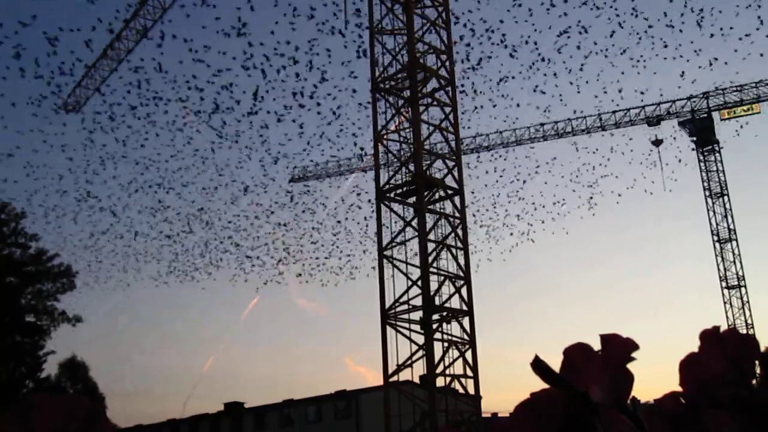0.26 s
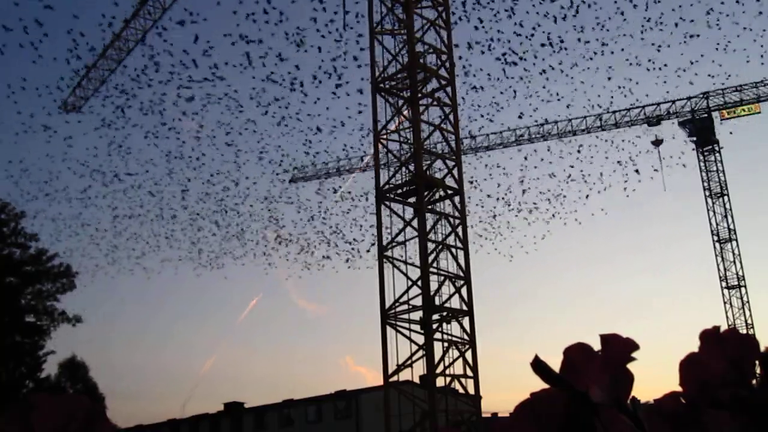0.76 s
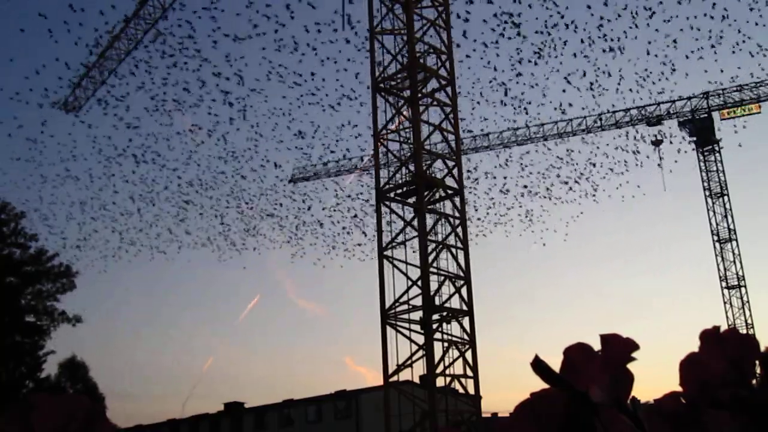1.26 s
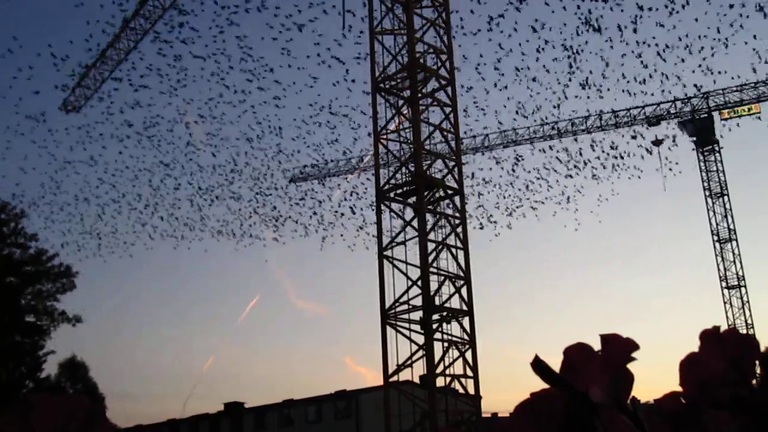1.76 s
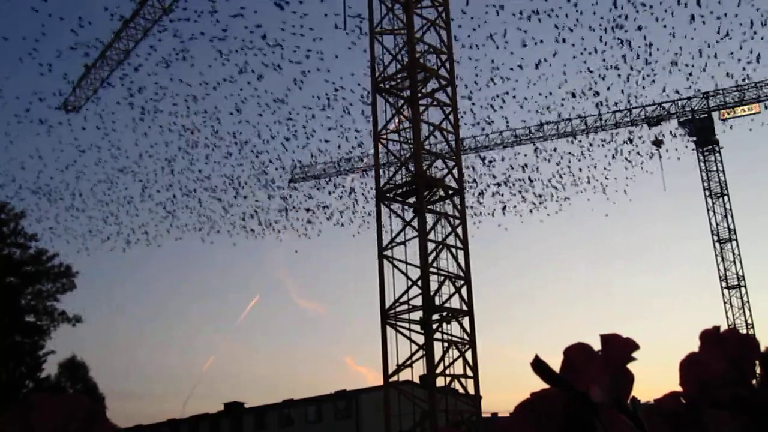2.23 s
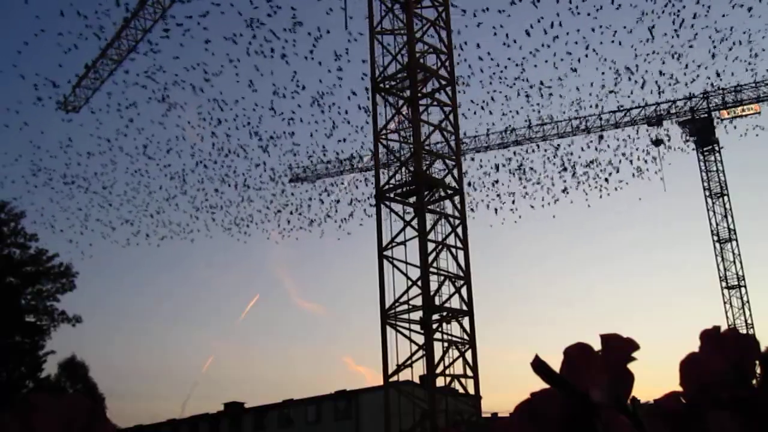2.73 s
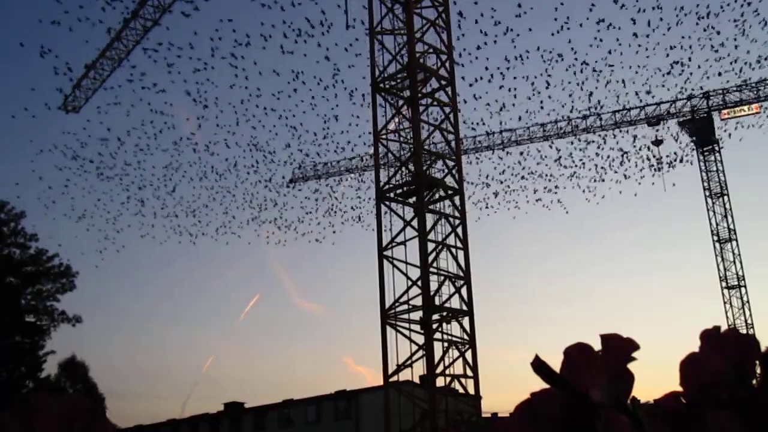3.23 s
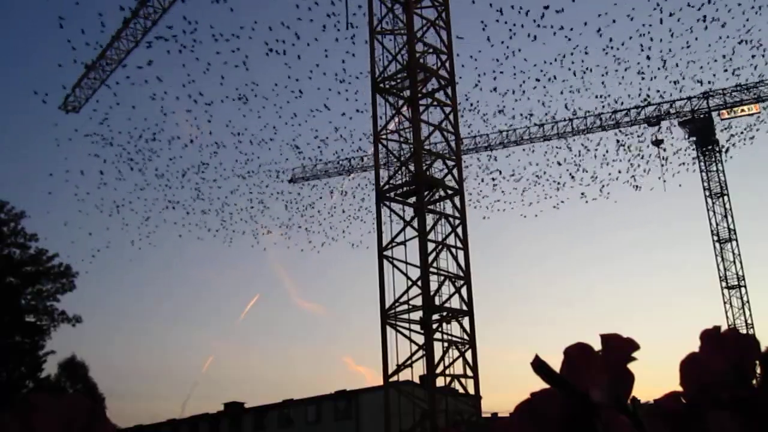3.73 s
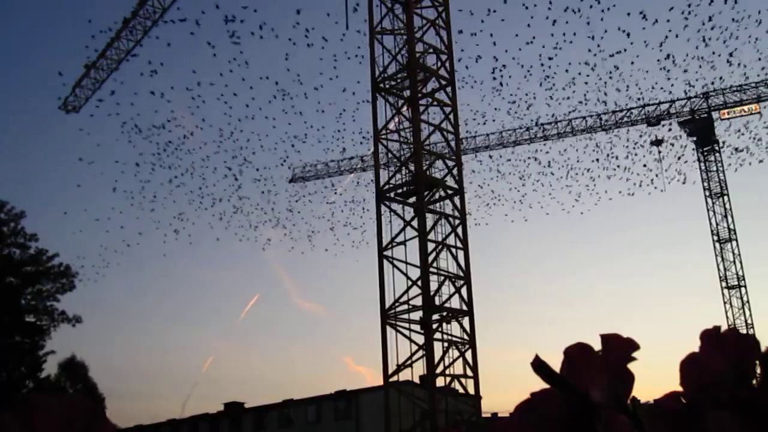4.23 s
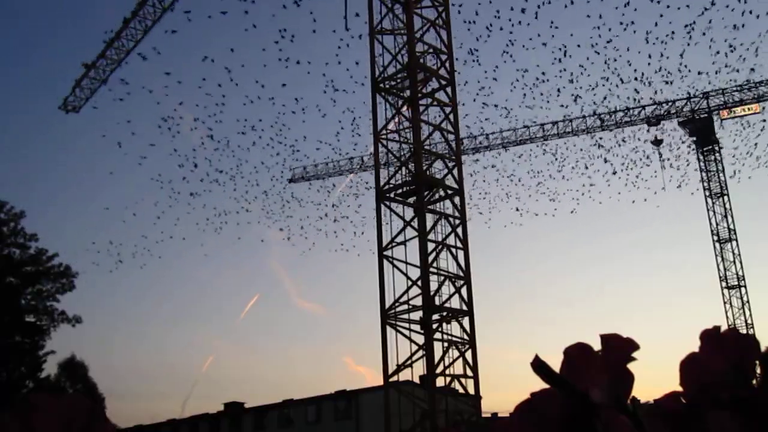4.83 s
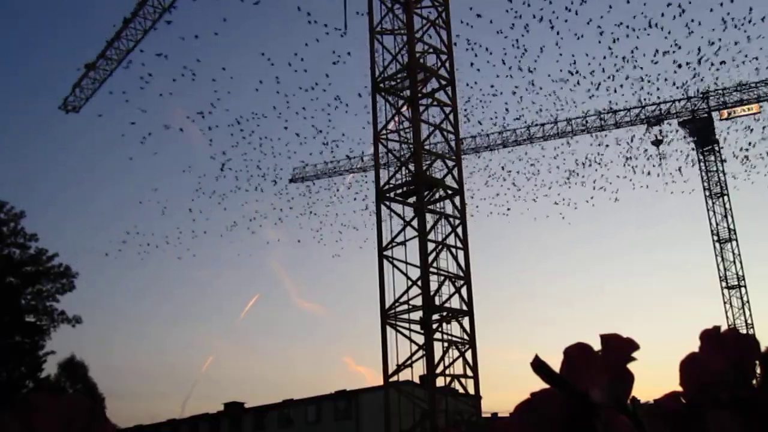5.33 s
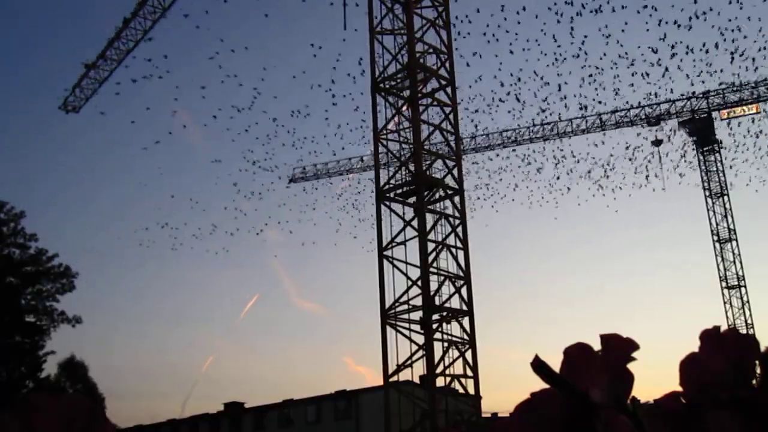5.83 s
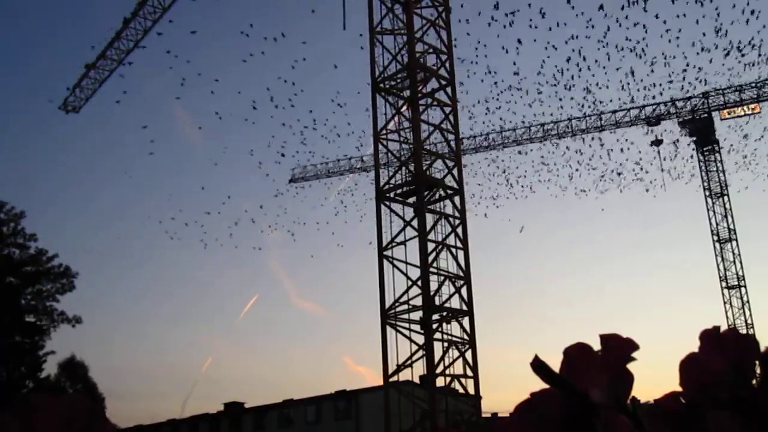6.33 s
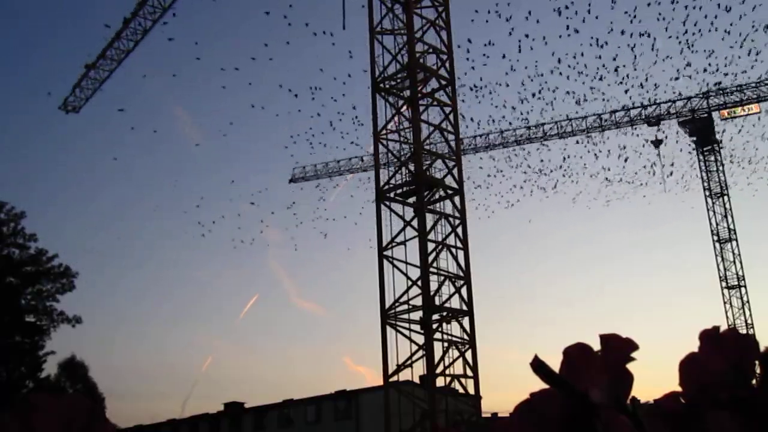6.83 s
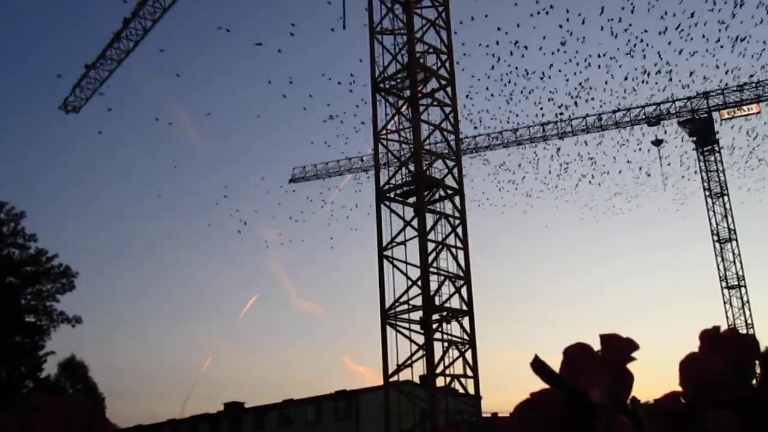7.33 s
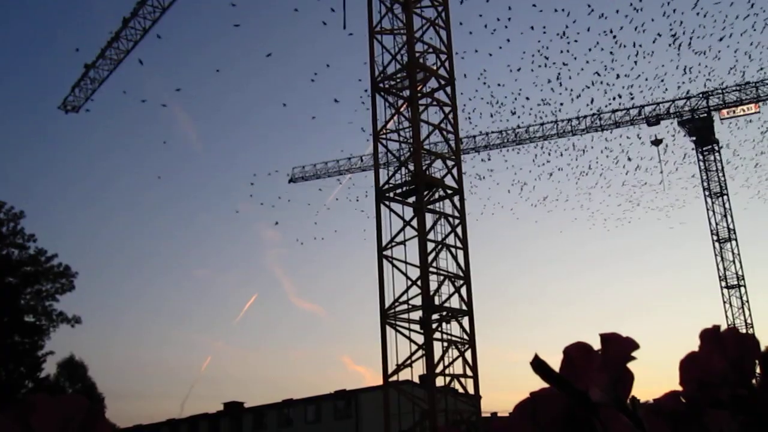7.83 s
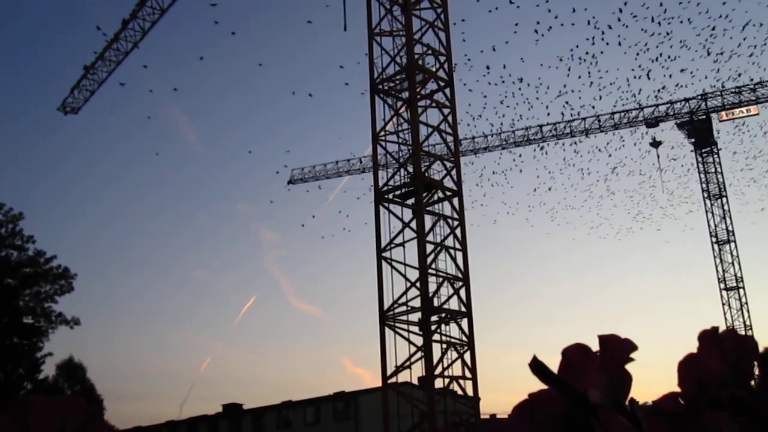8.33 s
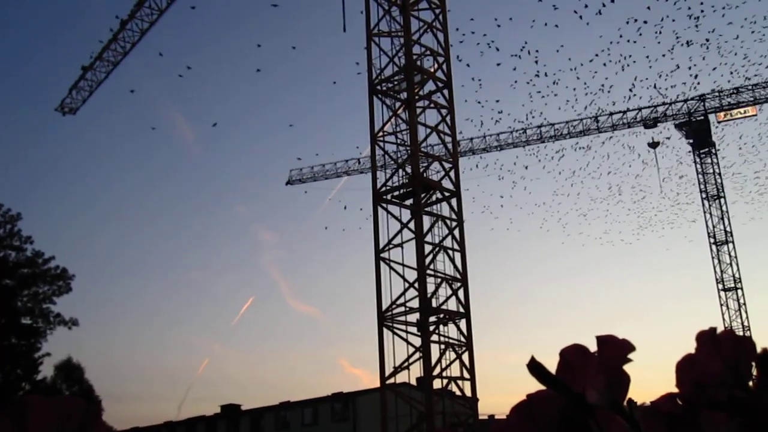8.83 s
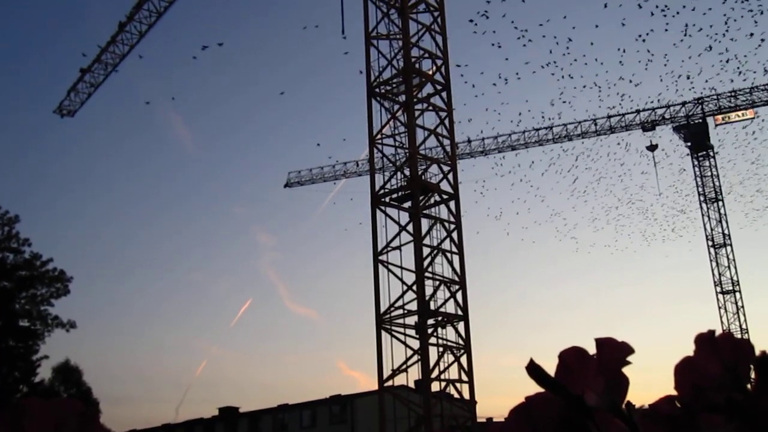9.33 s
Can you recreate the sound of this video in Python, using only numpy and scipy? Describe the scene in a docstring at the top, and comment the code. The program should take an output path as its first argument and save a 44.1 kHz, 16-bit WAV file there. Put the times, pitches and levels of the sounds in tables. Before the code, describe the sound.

Sharp jackdaw calls and far rook caws outdoors give way to a whole flock calling loudly overhead.

```python
"""A building site at dusk, one microphone under a big wheeling flock of jackdaws.
Close by, single birds call "tchak", a short falling note of the syrinx shaped by throat and beak,
while rooks caw far off; after about 3.5 s the whole flock joins in from further away.
House fronts throw the calls back. Behind them are the murmur of the town, two dry ticks
and a soft, high hiss that slowly fades."""
import sys
import numpy as np
from scipy import signal
from scipy.fft import rfft, irfft, next_fast_len
from scipy.io import wavfile
from scipy.ndimage import uniform_filter1d

SR = 44100
rng = np.random.default_rng(int(sys.argv[2]) if len(sys.argv) > 2 else 0)


def dump(signal):
    """Clip the signal to [-1, 1] and save it as 16-bit WAV at the path in sys.argv[1]."""
    limited = np.clip(np.atleast_2d(signal).T, -1, 1)
    pcm = np.round(limited * 32767).astype(np.int16)
    wavfile.write(sys.argv[1], SR, pcm)


N = 422037
CUTOFF_HZ = 15700

# Jackdaws close to the microphone: (time [s], length [s], starting pitch [Hz], body level [dB],
# upper harmonics relative to the body [dB], hoarseness [0-1])
NEAR_TCHAKS = [(.02, 0.059, 1174, -35, -7.5, 0.98), (.04, 0.059, 1450, -40, -12, .9),
               (.296, 0.036, 1375, -34.5, -8.5, 0.24), (1.681, 0.035, 1226, -32.5, -13, 0.73),
               (1.834, 0.026, 1460, -32.5, -9, 0.63), (2.231, 0.025, 1340, -29.5, -6, 0.66),
               (2.527, 0.034, 1328, -32, -8.5, 0.42), (2.692, 0.021, 1278, -34.5, -14, 0.05),
               (2.92, 0.027, 1260, -28, -7, 0.52), (3.14, 0.045, 1225, -35, -6.5, 0.54),
               (3.411, .022, 1387, -37.5, -4, 0.5), (3.435, 0.031, 1065, -36.5, -15, 1),
               (3.59, 0.017, 1224, -35, -11.5, 0.23), (3.68, 0.026, 1398, -32.5, -20, 0.3),
               (3.709, .025, 1360, -30, -13.5, .4), (3.802, 0.034, 1212, -32.5, -8, 0.96),
               (4.087, .015, 1351, -31.5, -4.5, 1), (4.111, 0.028, 1296, -30, -10, 0.48),
               (4.29, 0.035, 1450, -32, -7, .6), (4.327, 0.044, 1322, -28, -1.5, .45),
               (4.599, 0.027, 1310, -30.5, -10, 0.88), (4.722, 0.058, 1400, -34.5, -5.5, 0.54),
               (4.761, 0.027, 1460, -29, -2.5, 0.68), (4.855, 0.015, 1183, -33, -1.5, 0.33),
               (4.888, 0.019, 1257, -29, 0, 0.46), (5.004, .036, 1320, -25.5, -3, 0.51),
               (5.052, 0.03, 1333, -28, -13, 0.72), (5.152, 0.024, 1173, -27, -7.5, 0.8),
               (5.382, 0.069, 1354, -30.5, -16, 0.45), (5.608, 0.014, 1236, -28.5, -13, 0.2),
               (5.68, 0.029, 1194, -33, -23, 0.12), (5.843, 0.034, 1467, -32, 1.5, 0.62),
               (5.978, 0.066, 1446, -30, -9, 0.88), (6.016, 0.014, 1255, -32.5, -3, 0.3),
               (6.098, 0.04, 1312, -25, -4, 0.47), (6.631, 0.03, 1333, -24.5, -10, 0.65),
               (6.698, 0.033, 1256, -34, -2.5, 0.7), (6.851, 0.042, 1335, -29.5, -8.5, 0.45),
               (7.106, 0.024, 1197, -28.5, -7.5, 0.77), (7.273, 0.024, 1298, -27, -16, 0.07),
               (7.42, .06, 1300, -29.5, -11.5, 0.82), (7.72, 0.046, 1423, -30, -6.5, 0.64),
               (7.772, 0.026, 1150, -26.5, -10.5, 0.77), (7.902, 0.051, 1324, -31, -14, .4),
               (8.113, 0.031, 1293, -25, -3, .3), (8.342, .02, 1380, -28, -16, 0.23),
               (8.434, 0.025, 1220, -33, -5, 0.1), (8.525, 0.033, 1390, -29.5, -9, .5),
               (8.765, 0.034, 1198, -28.5, -12, 0.65), (8.901, 0.046, 1300, -28.5, -15, 0.62),
               (9.048, .023, 1410, -32, -4.5, 0.44), (9.226, 0.013, 1173, -28.5, -11.5, 0.43),
               (9.483, .023, 1395, -31, -9.5, 0.6)]
# Their throat resonances: (frequency [Hz], gain [dB])
JACKDAW_FORMANTS = [(600, -29), (900, -14), (1250, -12), (1600, 1), (2000, -2), (2500, 5), (3100, -10),
                    (4000, -10), (5000, -11), (6000, -10), (7000, -14.5), (8600, -9), (11500, -16.5),
                    (15000, -45)]


def near_jackdaws(split_hz=3300, clear_end_hz=1168, hoarse_end_hz=840.6, directions=8):
    """Close birds: the second harmonic carries each call, and each direction has its own echoes."""
    direct, to_walls = np.zeros(N), np.zeros((directions, N))
    lows, highs = (signal.butter(4, split_hz, kind, fs=SR, output="sos") for kind in ("low", "high"))
    for i, (s, length, pitch, db, bright_db, hoarse) in enumerate(NEAR_TCHAKS):
        # a hoarse bird slides deeper, and its unsteady pitch smears the overtones into a rasp
        end_hz = clear_end_hz + hoarse * (hoarse_end_hz - clear_end_hz)
        note = tchak(length, pitch, fall=1 - end_hz / pitch, jitter=.045 * hoarse, rasp=.55 * hoarse)
        call = coloured(note, JACKDAW_FORMANTS)
        beak_hz = 4450 - 102 * bright_db  # higher in duller calls
        overtones = beak(signal.sosfilt(highs, call), beak_hz, width_hz=700, lift=5.5)
        body = from_db(db) * rms_one(signal.sosfilt(lows, call))
        edge = from_db(db + bright_db) * rms_one(overtones)
        add(direct, s, body + edge)
        add(to_walls[i % directions], s, from_db(-4) * body + from_db(-3) * edge)
    early = sum(house_fronts(birds, t60=.33, dull_hz=11200, first_s=.012) for birds in to_walls)
    late = from_db(-10) * house_fronts(direct, t60=.92, dull_hz=4000)
    return direct + early + late


def tchak(length, pitch, fall, jitter, rasp, attack_s=.00031, release_s=.0074, bend=1.7, swell=.35):
    """One jackdaw note: it starts at once, swells, slides down ever faster and ends hoarser."""
    t = np.arange(int((length + 4 * release_s) * SR)) / SR
    progress = np.minimum(t / length, 1.2)
    glide_hz = pitch * (1 - fall * progress ** bend)
    roughness = .5 + progress
    voice = syrinx(glide_hz, jitter * roughness, rasp * roughness, flutter_hz=1403)
    onset = 1 - np.exp(-t / attack_s)
    release = np.exp(-np.maximum(t - .85 * length, 0) / release_s)
    return voice * onset * (1 + swell * progress) * release


def syrinx(pitch, jitter, rasp, flutter_hz, uneven_db=2.5):
    """A bird's voice: harmonics on an unsteady pitch, with a puff of air in every cycle."""
    pitch = pitch * (1 + jitter * wobble(len(pitch), flutter_hz))
    phase = 2 * np.pi * (np.cumsum(pitch) / SR + rng.random())
    harmonic = np.arange(1, 15)[:, None]
    strength = from_db(uneven_db * rng.standard_normal(harmonic.shape)) * (harmonic * pitch < CUTOFF_HZ)
    stack = (strength * np.cos(harmonic * phase + 2 * np.pi * rng.random(harmonic.shape))).sum(0)
    puffs = rasp * rng.standard_normal(len(pitch)) * (1 + np.cos(phase))
    return rms_one(stack) + puffs


def beak(x, hz, width_hz=750, lift=4.27):
    """The open beak lifts the overtones around one resonance."""
    b, a = signal.iirpeak(hz, hz / width_hz, fs=SR)
    return x + lift * signal.lfilter(b, a, x)


# The distant flock once it has joined in: (time [s], level [dB])
CHORUS_LEVELS = [(3.65, -33), (3.76, -35.5), (4.1, -34), (4.28, -29.5), (4.74, -29.5), (5.03, -25.5),
                 (5.45, -25.5), (5.61, -24), (6.11, -25), (6.22, -25), (7.41, -25.5), (7.54, -26),
                 (7.75, -27.5), (7.95, -24), (8.66, -28.5), (9.32, -30), (9.57, -28.5)]
# Its colour at the microphone: (frequency [Hz], gain [dB])
CHORUS_SPECTRUM = [(450, -18.5), (680, -9), (880, 3), (1250, -10.5), (1550, 5), (2100, 9.5), (2500, 2),
                   (3000, -3), (3900, -21), (4900, -13), (6900, -21), (8600, -18.5), (11300, -23.5),
                   (15500, -53)]
# The flock over the site and the hiss behind it: (time [s], call rate [1/s], level of the hiss [dB])
CALL_RATE_AND_HISS = [(0, 56, -38), (2, 38, -38.5), (3.3, 46.4, -41.5), (4.8, 170, -44.5), (8, 170, -49),
                      (9.57, 115.3, -45.5)]


def distant_flock(sky_parts=4, chatter_db=-52, join_s=.14):
    """Faint chatter from several parts of the sky swells to a full chorus within a moment."""
    calls_per_s, _ = in_time(CALL_RATE_AND_HISS)
    calls = sum(flock_part(calls_per_s / sky_parts) for _ in range(sky_parts))
    chorus = coloured(calls, CHORUS_SPECTRUM)
    running_rms = np.sqrt(uniform_filter1d(chorus ** 2, int(.1 * SR)) + 1e-6)
    level_db, = in_time([(CHORUS_LEVELS[0][0] - join_s, chatter_db)] + list(CHORUS_LEVELS))
    return from_db(level_db) * chorus / running_rms


def flock_part(calls_per_s, spread_db=3, pitch_hz=1310, pitch_spread=.075, birds=70):
    """Many jackdaws call at random moments, each from its own distance, and echo together."""
    voices = []
    for long, steep, bright in rng.random((birds, 3)):
        pitch = pitch_hz * np.exp(pitch_spread * rng.normal())
        note = tchak(.02 + .025 * long, pitch, fall=.0993 + .159 * steep, jitter=.021, rasp=.33)
        voices.append(beak(note, hz=4000 + 4500 * bright ** 2))
    out = np.zeros(N)
    starts = np.flatnonzero(rng.random(N) < calls_per_s / SR)
    for start, (who, nearness) in zip(starts, rng.random((len(starts), 2))):
        db = spread_db * min(-np.log(1 - nearness), 2.5)  # most are far, a few closer and louder
        add(out, start / SR, from_db(db) * voices[int(who * birds)])
    return out + from_db(-3) * house_fronts(out, t60=.32, dull_hz=7850)


# Rooks far from the microphone:
# (time [s], length [s], top pitch [Hz], mid-caw level [dB], hoarseness [0 = clear])
ROOK_CAWS = [(0, 0.36, 370, -39, 0.85), (0.541, 0.19, 386, -40, 0.37), (0.673, 0.24, 317, -40, 0.64),
             (0.903, 0.18, 333.3, -36.5, 1.16), (1.188, 0.21, 384, -38.5, 0.72),
             (1.305, 0.17, 347, -37.5, 0.93), (1.666, .24, 335, -36, 0.91), (1.918, 0.22, 349.6, -36, 1.1),
             (2.13, 0.25, 380, -42, 0.25), (2.375, 0.26, 400, -41.5, 0.19)]
# Their throat resonances: (frequency [Hz], gain [dB])
ROOK_FORMANTS = [(400, -33), (1000, -1.5), (1450, 5.5), (2000, 4), (2500, -10), (3400, -7.5), (5200, -12),
                 (7000, -24)]


def far_rooks(arch=.0486):
    """Long caws whose pitch rises and sinks a little, half lost in echoes."""
    out = np.zeros(N)
    for s, length, pitch, db, hoarse in ROOK_CAWS:
        swell = np.sin(np.linspace(0, np.pi, int(length * SR))).clip(0) ** .5
        arch_hz = pitch * (1 + arch * (swell - 1))
        voice = syrinx(arch_hz, jitter=.0618 * hoarse, rasp=1.2 * hoarse, flutter_hz=301.5, uneven_db=2.6)
        add(out, s, from_db(db) * coloured(voice, ROOK_FORMANTS) * swell)
    return out + from_db(-1) * house_fronts(out, t60=.56, dull_hz=5000)


# Ticks that reach the microphone dry: (time [s], level before envelope and filter [dB])
DRY_TICKS = [(4.276, -15), (8.296, -19)]


def ticks(decay_s=.0023, band_hz=(7000, 11500)):
    """Tiny bright snaps of noise with no echo."""
    out, t = np.zeros(N), np.arange(SR // 25) / SR
    envelope = np.exp(-t / decay_s) * (1 - np.exp(-2 * t / decay_s))
    for s, db in DRY_TICKS:
        add(out, s, from_db(db) * rng.standard_normal(len(t)) * envelope)
    return signal.sosfilt(signal.butter(3, band_hz, "band", fs=SR, output="sos"), out)


# The town beyond the site: (frequency [Hz], gain [dB])
TOWN_SPECTRUM = [(20, -9), (45, 3.5), (100, -7), (180, 1.5), (280, 3), (450, 2), (1000, 6), (2000, 7),
                 (4000, -40)]


def town(level_db=-41.5):
    """A steady, distant murmur with little treble."""
    return from_db(level_db) * coloured(rng.standard_normal(N), TOWN_SPECTRUM)


# Background hiss at the microphone: (frequency [Hz], gain [dB])
HISS_SPECTRUM = [(1000, -6.5), (3000, 1.5), (5000, -1), (7000, -3.5), (10000, -4), (12500, -9),
                 (15500, -27)]


def hiss():
    """A soft, high background hiss that slowly fades and comes back a little at the end."""
    _, level_db = in_time(CALL_RATE_AND_HISS)
    return from_db(level_db) * coloured(rng.standard_normal(N), HISS_SPECTRUM)


def house_fronts(x, t60, dull_hz, first_s=.006, echoes_per_s=900):
    """Scattered echoes from walls, roofs and ground, dulled on their way to the microphone."""
    t = np.arange(SR) / SR
    echoes = rng.standard_normal(SR) * (rng.random(SR) < echoes_per_s / SR)
    echoes *= (t > first_s) * from_db(-60 * t / t60)
    echoes /= np.sqrt(np.sum(echoes ** 2))
    reflected = signal.fftconvolve(x, echoes)[:N]
    return signal.sosfilt(signal.butter(1, dull_hz, fs=SR, output="sos"), reflected)


def from_db(db):
    """Decibels to gain."""
    return 10 ** (np.asarray(db) / 20)


def rms_one(x):
    """Scale to an rms of 1."""
    return x / np.sqrt(np.mean(x ** 2) + 1e-20)


def in_time(rows):
    """The columns of a curve at every sample."""
    s, *columns = np.transpose(rows)
    return [np.interp(np.arange(N) / SR, s, column) for column in columns]


def coloured(x, spectrum):
    """Pass a sound through a spectrum table; rms 1."""
    size = next_fast_len(len(x))
    hz, db = np.transpose(spectrum)
    bin_hz = np.maximum(np.fft.rfftfreq(size, 1 / SR), 1)
    gain = from_db(np.interp(np.log(bin_hz), np.log(hz), db))
    return rms_one(irfft(rfft(x, size) * gain, size)[:len(x)])


def wobble(size, hz):
    """Random unsteadiness up to about this rate."""
    knots = np.arange(size) * hz / SR
    return np.interp(knots, np.arange(size // 8 + 2), rng.standard_normal(size // 8 + 2))


def add(track, s, sound):
    """Mix a sound in from time s."""
    start = max(0, int(s * SR))
    part = track[start:start + len(sound)]
    part += sound[:len(part)]


def scene():
    """Near jackdaws, far rooks and ticks over the flock, town and hiss, in mono."""
    backdrop = distant_flock() + town() + hiss()
    return (near_jackdaws() + far_rooks() + ticks() + backdrop)[None]


def record(dry):
    """The microphone's signal, cut steeply above CUTOFF_HZ."""
    return signal.sosfilt(signal.ellip(14, .1, 80, CUTOFF_HZ, fs=SR, output="sos"), dry)


dry = scene()
out = record(dry)
dump(out)
```